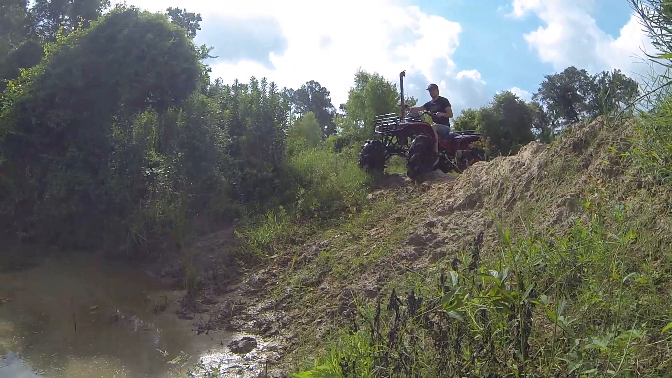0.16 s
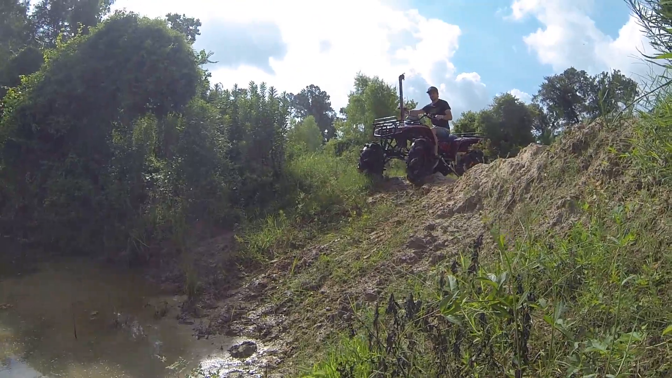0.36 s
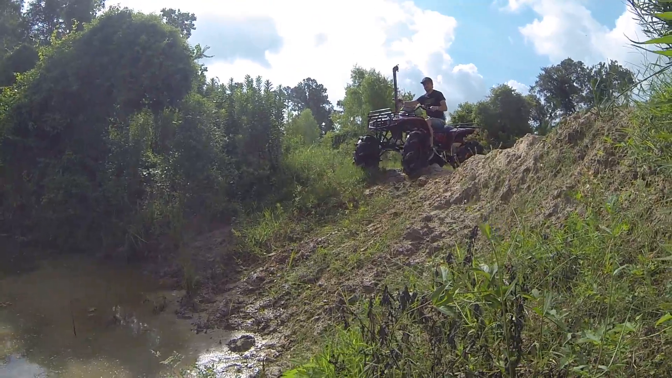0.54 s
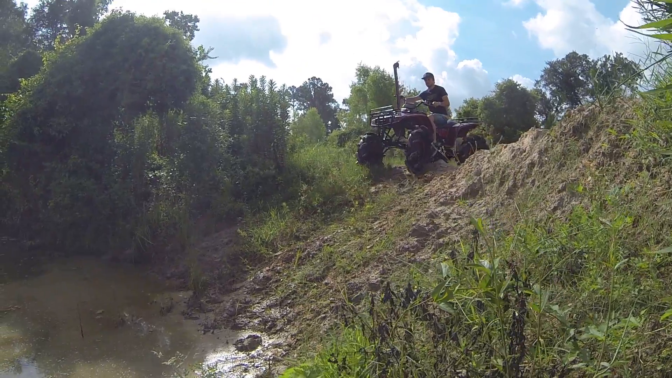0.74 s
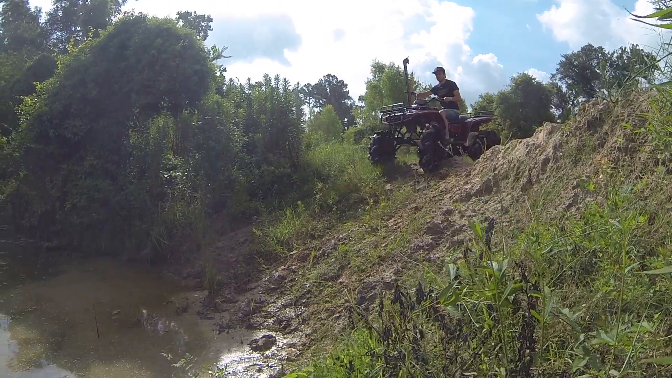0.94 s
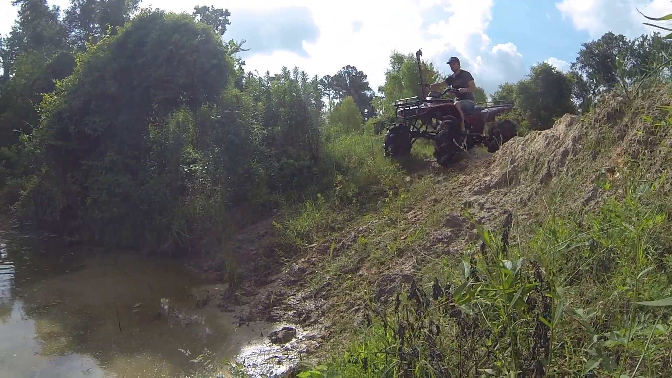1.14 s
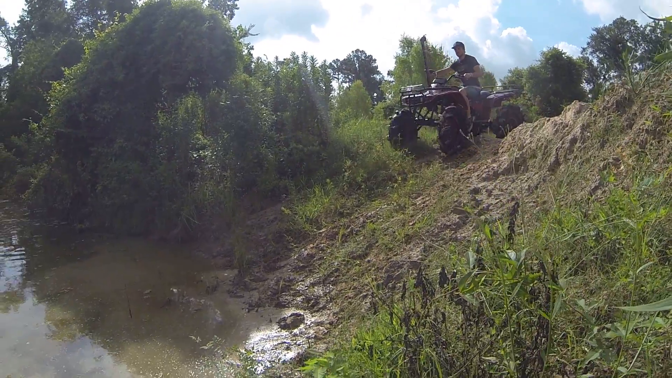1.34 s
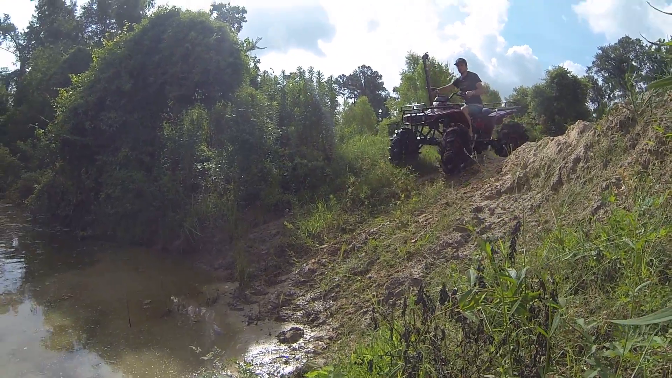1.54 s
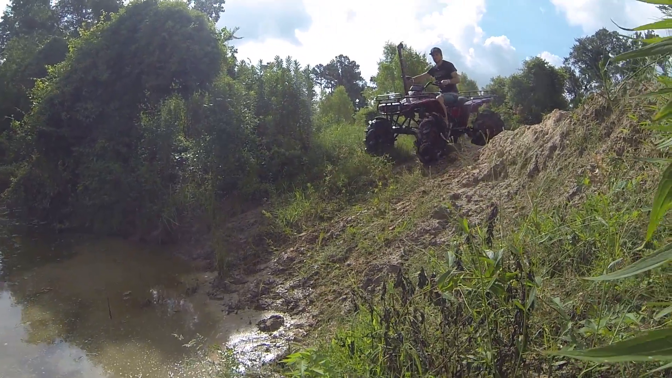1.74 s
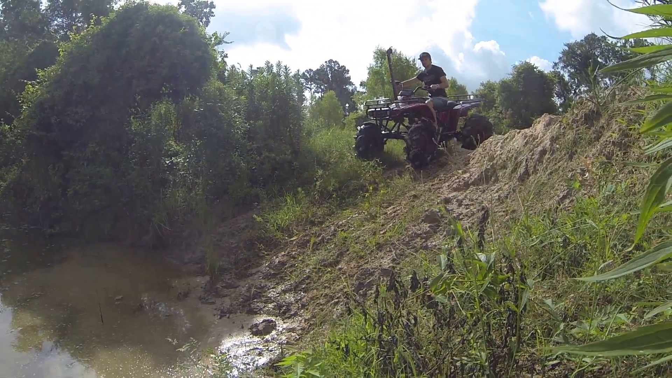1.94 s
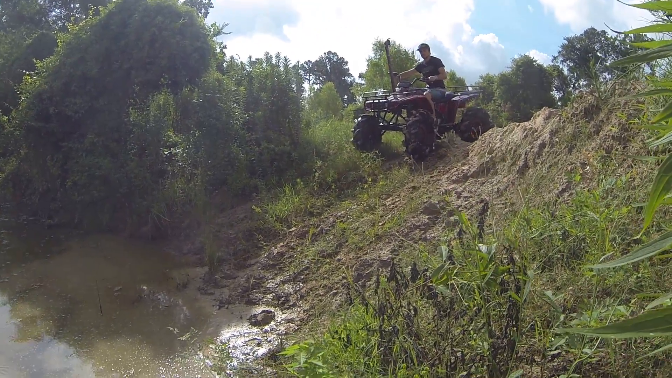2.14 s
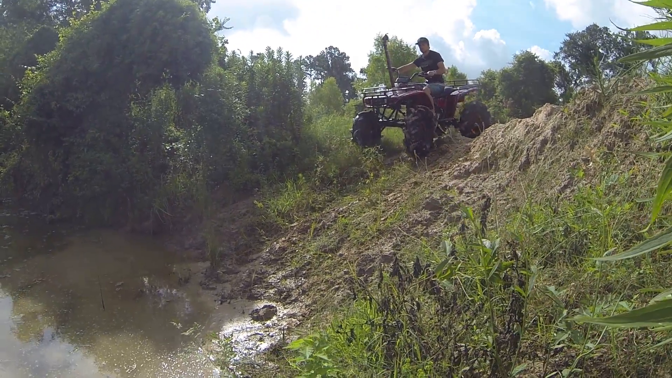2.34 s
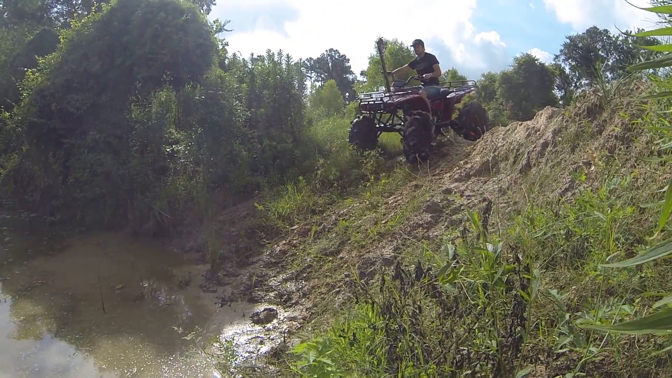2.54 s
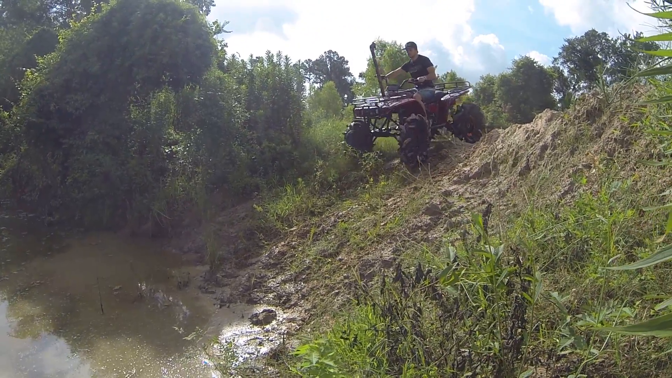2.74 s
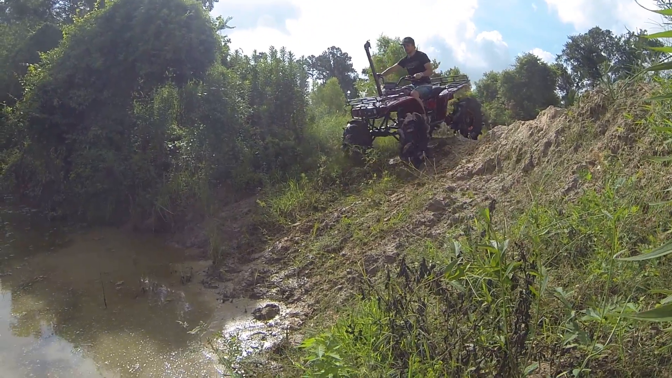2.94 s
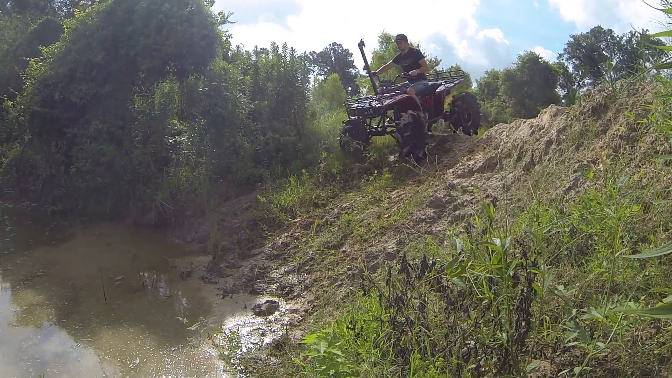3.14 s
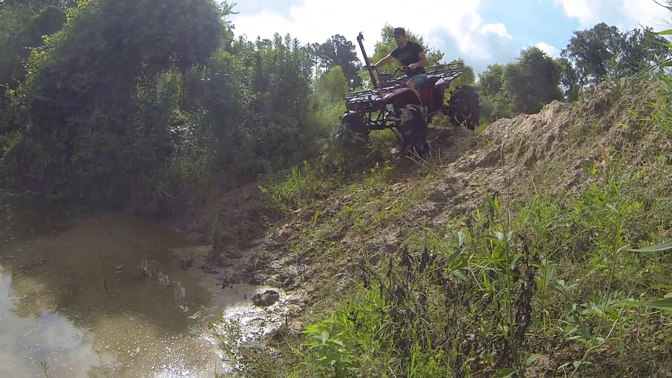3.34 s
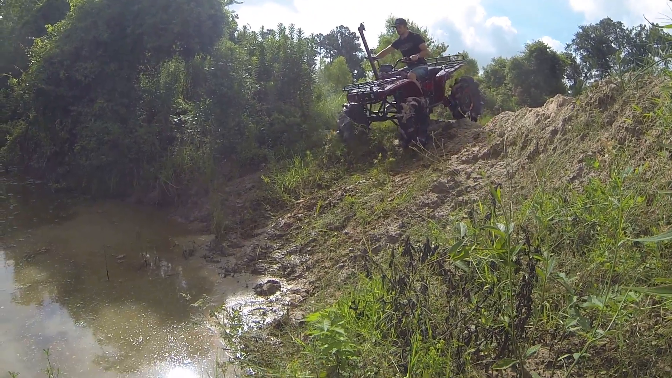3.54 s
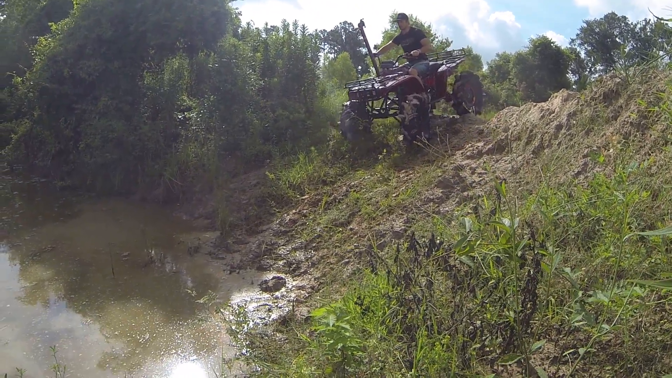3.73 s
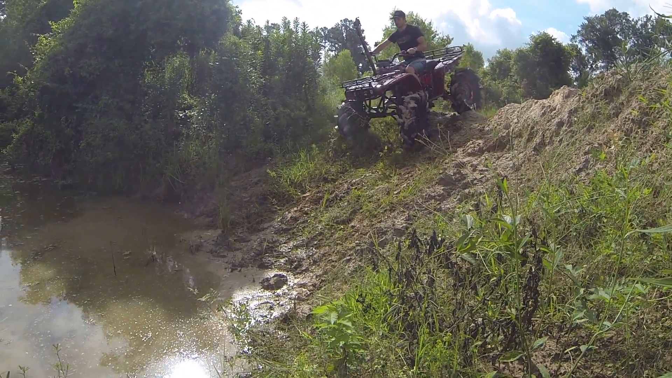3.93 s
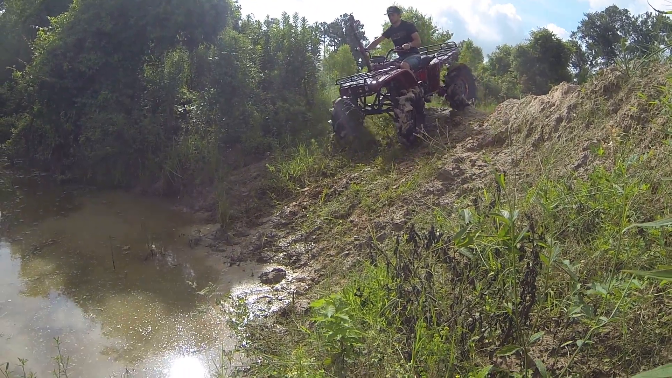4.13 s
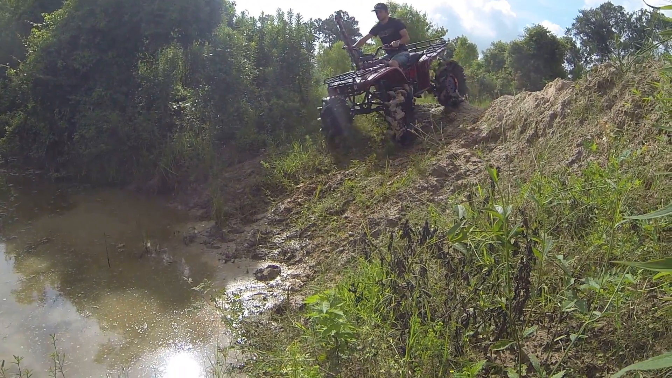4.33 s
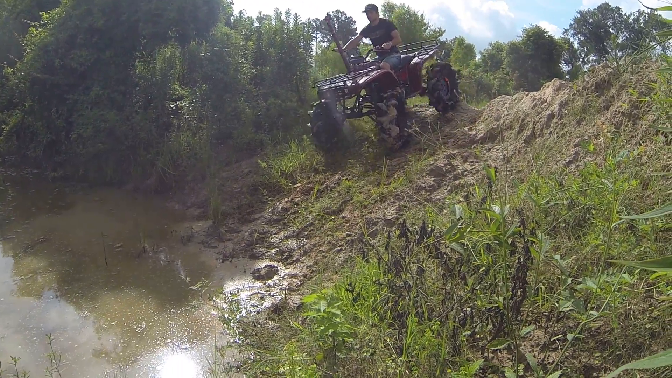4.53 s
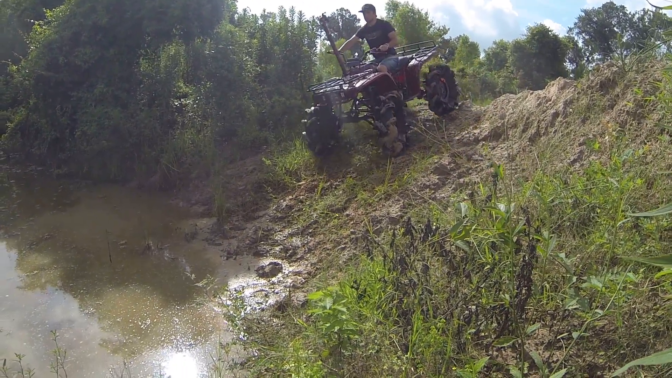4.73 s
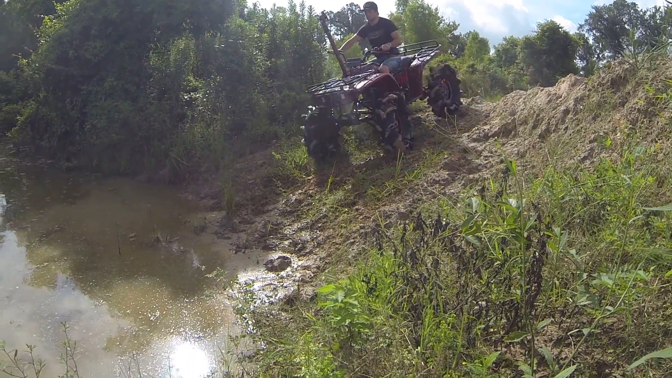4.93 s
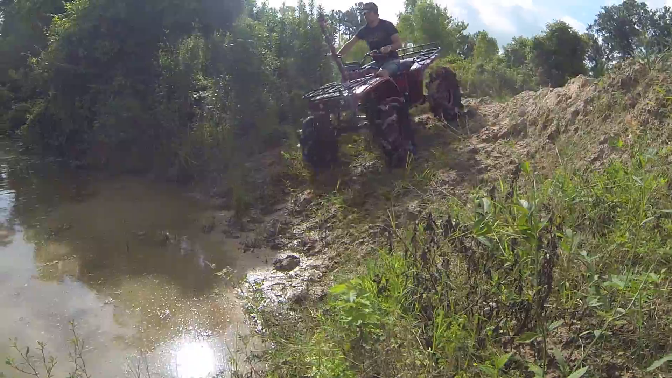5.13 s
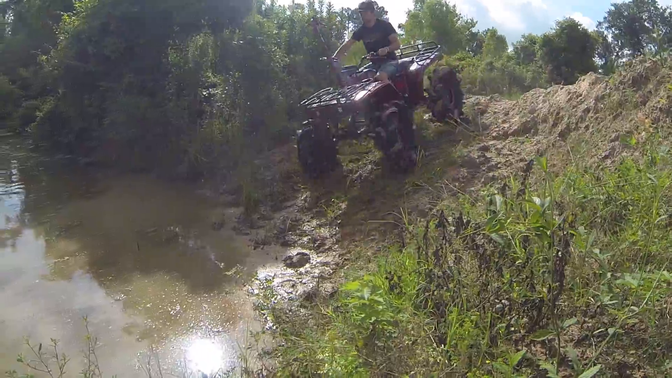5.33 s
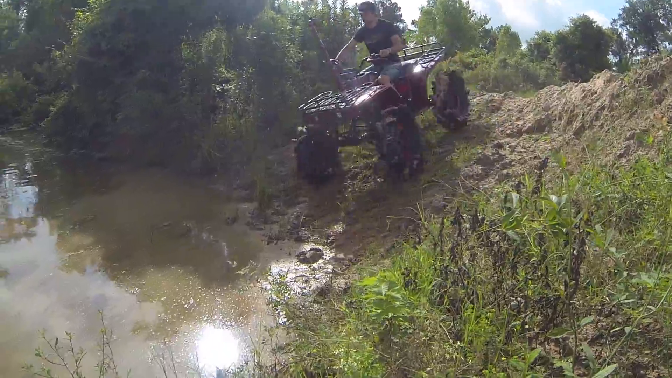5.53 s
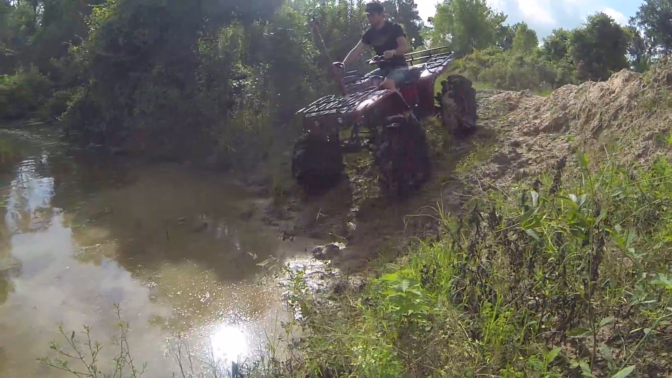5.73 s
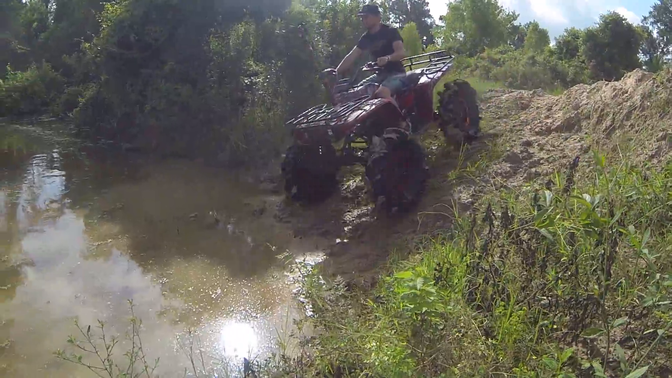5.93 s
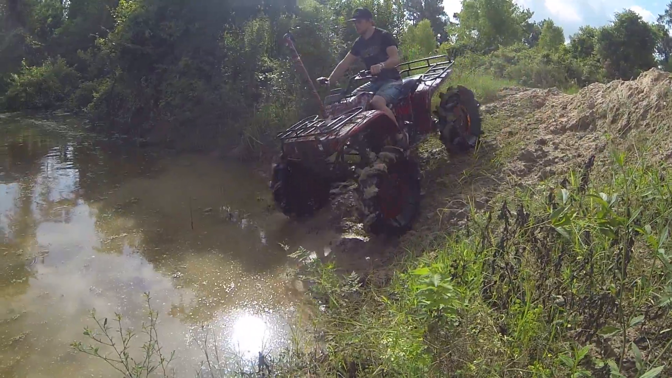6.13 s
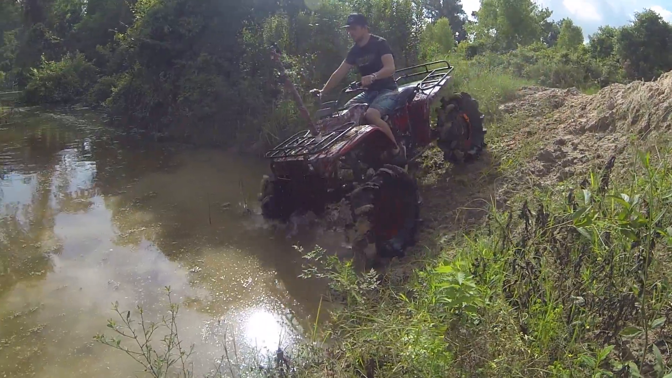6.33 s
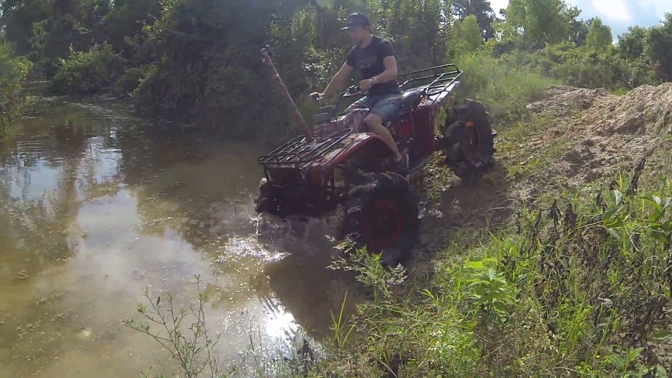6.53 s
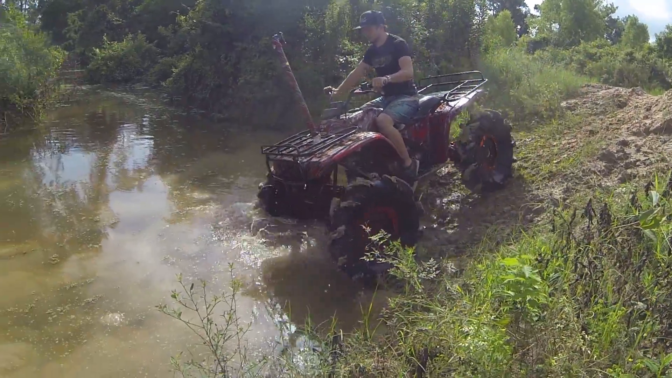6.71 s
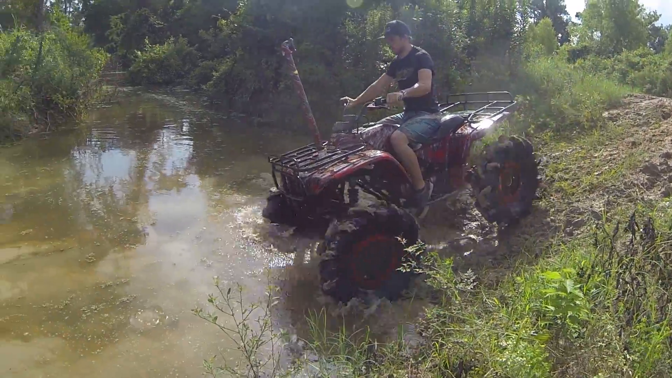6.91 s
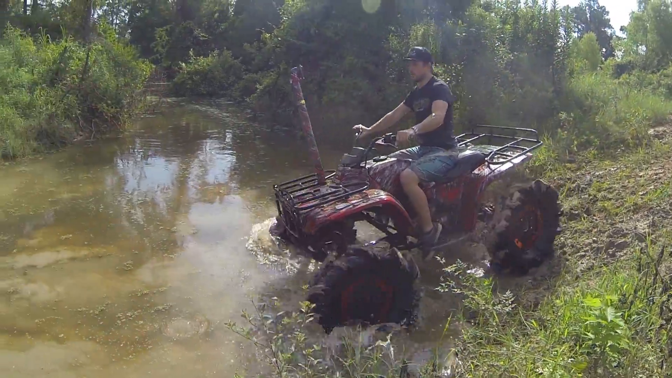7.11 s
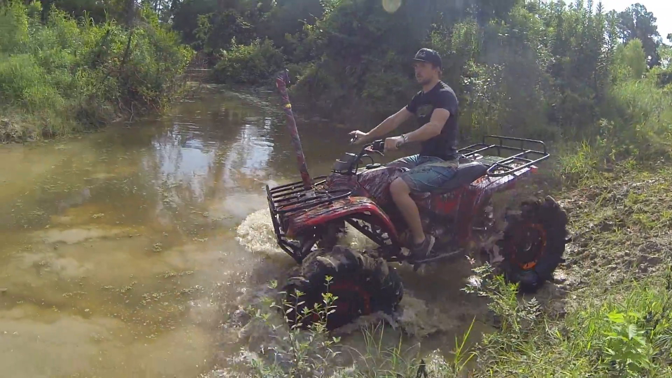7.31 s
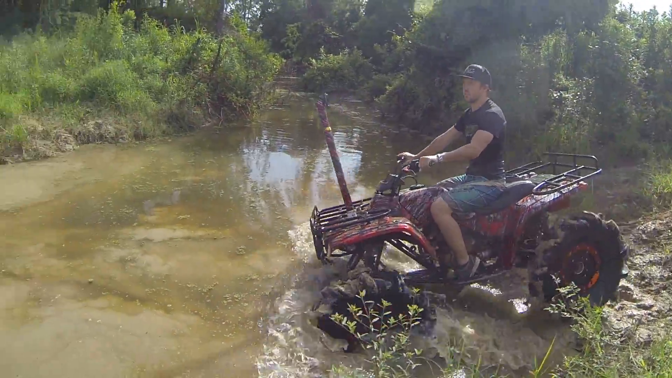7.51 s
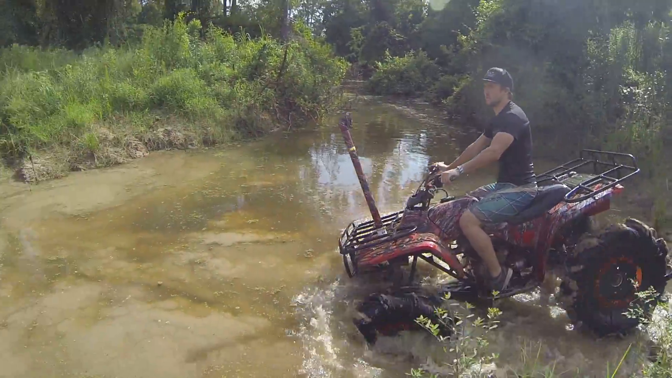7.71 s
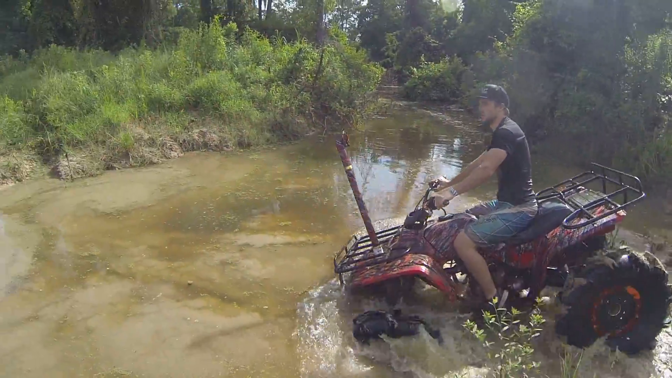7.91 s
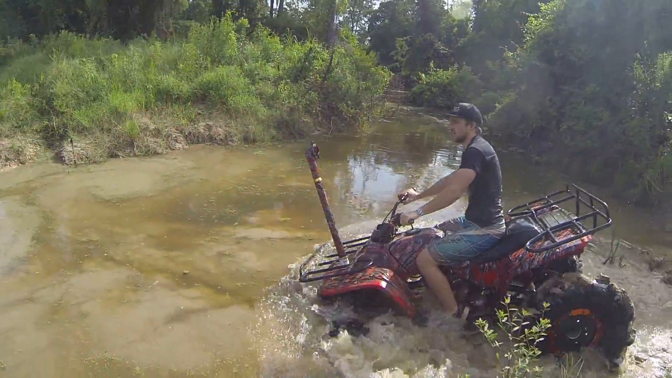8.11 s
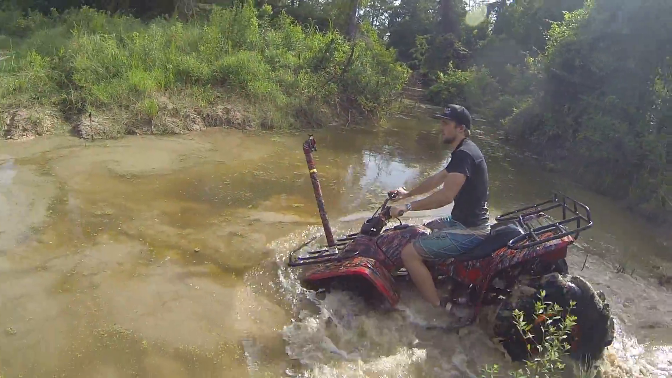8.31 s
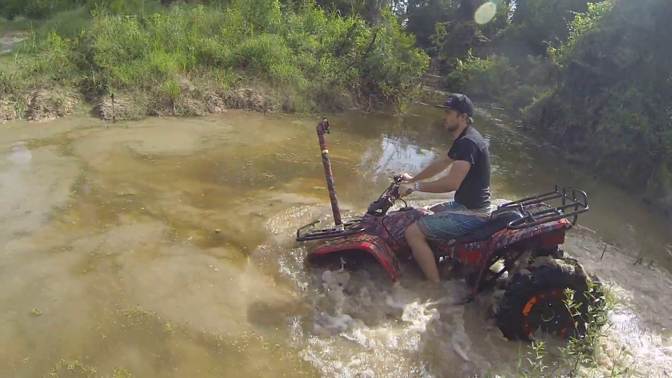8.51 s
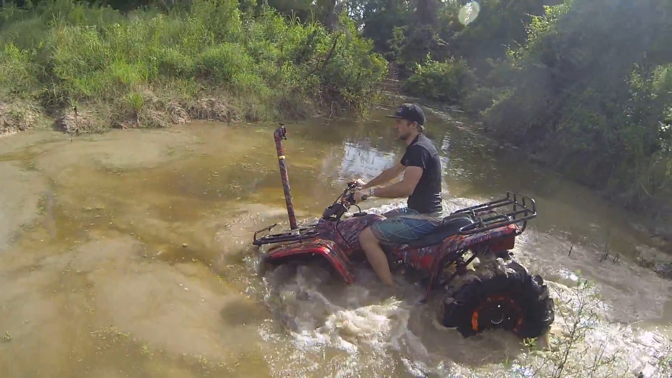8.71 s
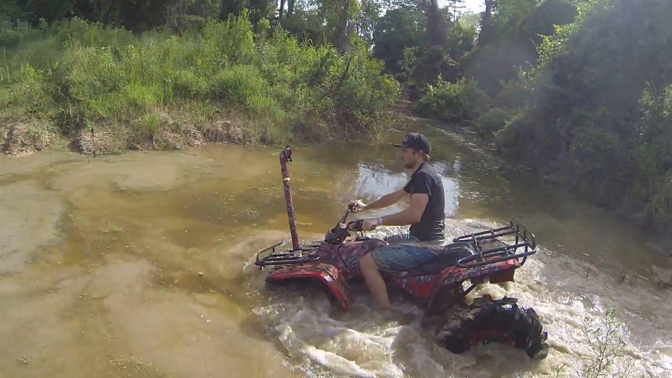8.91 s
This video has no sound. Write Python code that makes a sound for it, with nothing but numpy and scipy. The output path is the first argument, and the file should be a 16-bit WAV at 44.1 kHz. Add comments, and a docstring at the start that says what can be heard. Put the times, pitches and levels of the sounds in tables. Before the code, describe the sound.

A single-cylinder quad starts at moderate distance with two throttle blips, its low exhaust thumps separate and rattly. It slows to a lumpy crawl with missed firings while approaching, then pulls harder into a pond. Tyres churn, spray and gurgle, the frame knocks, and the outlet and casing become dull under water. Quiet open air and a very faint thin whine lie beneath, heard through a boxy, enclosed single microphone.

```python
"""At a flooded mud hole, a single-cylinder quad creeps down a bank, comes close and wades in.
Its exhaust thumps once per engine cycle, harder at speed, with runs of weak firings: short
puffs ring the silencer, and filtered noise adds flutter and rasp. Noise and ticks make the casing clatter.
The frame knocks and a dry hiss swells early on. Noise, drops and bubble notes make the tyres churn and splash.
Casing and outlet grow dull in the water. Soft outdoor air and a thin whine lie beneath."""
import sys
import numpy as np
from scipy import signal
from scipy.fft import rfft, irfft, next_fast_len
from scipy.io import wavfile

SR = 44100
rng = np.random.default_rng(int(sys.argv[2]) if len(sys.argv) > 2 else 0)


def bounce(signal):
    """Save signal as a 16-bit WAV file at the path given by the first command-line argument."""
    frames = np.transpose(np.atleast_2d(signal))
    limited = np.clip(frames, -1, 1)
    pcm = np.round(limited * 32767).astype(np.int16)
    wavfile.write(sys.argv[1], SR, pcm)


N = 399546
TIME = np.arange(N) / SR  # seconds

# Engine speed: two blips of throttle, a crawl down the bank, a pull through the water.
# Each row: time in seconds, speed in engine cycles per second.
ENGINE_SPEED = [(0, 15.008), (0.31, 20.131), (0.93, 21.088), (1.18, 15.658), (1.52, 13.641), (1.86, 14.923),
                (2.23, 20.195), (2.42, 20.35), (2.51, 17.026), (2.85, 13.065), (3.31, 10.77),
                (3.34, 13.574), (3.62, 10.292), (3.86, 12.922), (4.02, 11.753), (4.49, 13.293),
                (4.64, 11.038), (4.84, 13.614), (5.32, 12.412), (5.43, 14.543), (6.37, 15.951),
                (6.96, 17.705), (7.63, 17.113), (7.79, 15.63), (8.44, 15.378), (9.06, 18.14)]
CRUISE = 16  # reference speed, engine cycles per second

# How open the engine is to the ear as it turns side-on and then goes under.
# Each row: time in seconds, change in casing clatter in dB, change in outlet rasp in dB.
ENGINE_EXPOSURE = [(0, 1.5, -1.5), (2.6, 1.5, -4), (4.2, 0.5, -2), (5.6, -1, -5.5), (7, 3, -2),
                   (7.35, 3, -1), (7.65, 3.5, -2.5), (7.9, -5.5, -28), (8.65, -8.5, -5.5), (9.06, -27, -9)]


def amp(db):
    """Turns decibels into a gain."""
    return 10 ** (np.asarray(db) / 20)


def unit(x):
    """Scales a sound to an average strength (rms) of 1."""
    return x / np.sqrt(np.mean(x ** 2) + 1e-20)


def curve(rows, t=TIME, column=1):
    """Reads one column of a time table, with straight lines between the rows."""
    rows = np.array(rows, float)
    return np.interp(t, rows[:, 0], rows[:, column])


def shape(points, hz):
    """Reads gains from a spectrum table of (Hz, dB), with pitch on a log scale."""
    f, db = np.transpose(points)
    return amp(np.interp(np.log(hz + 1), np.log(f + 1), db))


def modes(rows, hz):
    """Sums the response of resonances, each given as (Hz, width in Hz, dB)."""
    total = 0
    for f, width, db in rows:
        total = total + amp(db) / (1 + 1j * (hz ** 2 - f ** 2) / (hz * width + 1e-9))
    return total


def causal_taps(points, rings=(), size=8192):
    """Makes a filter with the given spectrum that rings only after it is struck."""
    hz = abs(np.fft.fftfreq(size, 1 / SR))
    log_gain = np.log(np.hypot(shape(points, hz), abs(modes(rings, hz))))
    response = np.exp(np.conj(signal.hilbert(log_gain)))  # minimum phase
    return np.fft.ifft(response).real[:size // 2]


def colour(x, points):
    """Filters a sound to a spectrum of (Hz, dB) and scales it to rms 1."""
    return unit(signal.oaconvolve(x, causal_taps(points))[:N])


def noise():
    """Plain white noise, the raw material of the rushing sounds."""
    return rng.standard_normal(N)


def wander(rate_hz):
    """Random drift of rms 1, with little movement faster than the given rate."""
    size = next_fast_len(N, True)
    hz = np.fft.rfftfreq(size, 1 / SR)
    spectrum = rfft(rng.standard_normal(size)) * np.exp(-(hz / rate_hz) ** 2)
    return unit(irfft(spectrum, size)[:N])


def clicks(per_s, spread_db):
    """Random clicks of either sign and uneven size, scaled to rms 1."""
    size = amp(spread_db * np.minimum(rng.exponential(1, N), 5)) * rng.choice([-1, 1], N)
    return unit(size * (rng.random(N) < per_s / SR))


def add(mix, s, sound):
    """Mixes a sound in at time s, cutting off what falls outside."""
    start = round(s * SR)
    part = mix[max(start, 0):max(start + len(sound), 0)]
    part += sound[max(-start, 0):][:len(part)]


def bursts(times, gains, rise_s, fall_s):
    """An envelope that swells and dies after each given moment."""
    t = np.arange(0, 10 * fall_s, 1 / SR)
    swell = (1 - np.exp(-t / rise_s)) * np.exp(-t / fall_s)
    swell /= swell.max()
    out = np.zeros(N)
    for s, gain in zip(times, gains):
        add(out, s, gain * swell)
    return out


def engine_db(t):
    """The engine is louder the nearer it is and the faster it runs."""
    # The quad comes closer. Each row: time in seconds, level of a full firing at cruising speed in dB.
    nearness = [(0, -28.5), (1.6, -28), (2.5, -26.5), (3.4, -26), (5.2, -24.5), (6.1, -22.5), (6.8, -20),
                (8.2, -19), (9.06, -18)]
    load_db = 0.6155  # dB per cycle per second above CRUISE
    return curve(nearness, t) + load_db * (curve(ENGINE_SPEED, t) - CRUISE)


def revving():
    """0 at a crawl, rising to 1 at the top of a blip of throttle."""
    return np.clip((curve(ENGINE_SPEED) - 13) / 7, 0, 1)


def firings():
    """Times the exhaust valve opens, and burn strength in dB; fuel left by a miss feeds the next firing."""
    # Runs of misfires. Each row: first second, last second, every how many cycles,
    # typical strength against a full firing in dB.
    misfires = [(1.04, 1.04, 1, -13), (2.5, 2.5, 1, -16), (2.9, 2.9, 1, -4), (3.06, 3.06, 1, -10),
                (3.24, 3.24, 1, -32), (3.67, 4.96, 2, -19), (5.34, 6.4, 2, -15), (6.46, 6.46, 1, -8),
                (6.59, 6.7, 2, -17), (7.05, 7.51, 4, -6)]
    miss_spread, full_miss_db, rich_db = 0.1, -15, 1  # rich_db: boost after a full miss
    cycles = np.cumsum(curve(ENGINE_SPEED)) / SR
    times = np.interp(np.arange(.5, cycles[-1]), cycles, TIME)
    burn_db = np.zeros(len(times))
    for first_s, last_s, every, db in misfires:
        first = np.argmin(abs(times - first_s))
        last = np.argmin(abs(times - last_s))
        burn_db[first:last + 1:round(every)] = db
    unburnt = np.clip(np.roll(burn_db, 1) / full_miss_db, 0, 1)
    varied_db = burn_db * (1 + miss_spread * rng.standard_normal(len(times)))
    return times, varied_db + rich_db * unburnt


def exhaust(times, burn_db):
    """Gas blows out sharply, then the rising piston pushes it and it rebounds; all ring the silencer."""
    # A puff of gas at cruising speed. Each row: frequency in Hz, level in dB.
    puff_spectrum = [(15, -46), (35, 12), (60, 0.5), (100, 1), (170, 2), (260, -5.5), (350, -11),
                     (420, -17.5), (550, -27), (800, -60)]
    # Silencer resonances at cruising speed. Each row: frequency in Hz, width in Hz,
    # level against the direct puff in dB.
    silencer_rings = [(101.6, 41, -1.5), (157, 17, -4), (249.7, 22.7, 2.5), (347.7, 15.5, 5)]
    # The way from the tailpipe past mud and water. Each row: time in seconds,
    # highest frequency that gets past in Hz, strength of the ground echo as a gain.
    tailpipe_path = [(0, 530, 0.32), (3.2, 520, 0.32), (4.8, 510, .08), (5.35, 377, 0.07), (5.9, 342, 0.64),
                     (6.5, 372, 0.75), (7, 400, 0.2), (7.65, 446, 0.24), (7.95, 276, 0.13),
                     (9.06, 268, 0.14)]
    echo_s, steep = 0.003, 20  # ground echo delay in seconds; steepness of the treble cut
    lag_s, lag_cycles = 0.00583, 0.0731  # wait before the piston's push: fixed part, part of a cycle
    push, rebound, push_hz = 0.99, 0.096, 310  # two gains; the push is softer above about this Hz
    shorten, bite = 0.26, 0.14  # a faster engine or a richer charge gives a shorter puff
    heat, damping = 0.15, 0.21  # fast hot gas raises and damps the resonances
    bass_per_cycle, uneven = 4.25, 0.066  # bass cut in Hz per unit of speed; random variation
    size = 16384
    lead = size // 4  # room ahead of the thump, in samples
    hz = np.fft.rfftfreq(size, 1 / SR)
    out = np.zeros(N)
    chances = 1 + uneven * rng.standard_normal((len(times), 3))
    for s, db, chance in zip(times, burn_db, chances):
        speed = curve(ENGINE_SPEED, s)
        pace = speed / CRUISE
        top_hz = curve(tailpipe_path, s, column=1)
        echo = curve(tailpipe_path, s, column=2)

        quick = chance[2] * pace ** shorten * amp(bite * max(db, 0))
        puff = shape(puff_spectrum, hz / quick)
        # close puffs merge into a steady flow and lose their bass
        puff = puff / np.hypot(1, (bass_per_cycle * speed / (hz + 1)) ** 3)
        silencer = 1 + pace ** -damping * modes(silencer_rings, hz / pace ** heat)

        delay = lag_s + lag_cycles / speed
        later = np.exp(-2j * np.pi * hz * delay - (hz / push_hz / chance[1]) ** 2)
        strokes = 1 + push * chance[0] * later + rebound * later ** 2
        path = 1 + echo * np.exp(-2j * np.pi * hz * echo_s)
        path = path / np.sqrt(1 + (hz / top_hz) ** steep)

        thump = np.roll(irfft(puff * silencer * strokes * path), lead)
        add(out, s - lead / SR, amp(engine_db(s) + db) * thump / thump.max())
    return out


def gas_flow(times, burn_db):
    """Every cycle makes gas flutter in the pipe; a good firing also rasps at the outlet."""
    flutter_db, rasp_db, chuff_db, jet_db = -25, -24, -3, -14  # chuff and jet are set against the rasp
    crack, ragged_db, grit = 1.9, 2.64, 0.89  # crack above 1: rasp grows faster than the thump
    force = amp(engine_db(times))
    blast = force * amp(crack * burn_db + ragged_db * rng.standard_normal(len(times)))

    flutter = colour(noise(), [(20, -22.5), (55, 1.5), (90, -16), (130, 1.5), (175, -4),
                               (270, -13.5), (400, -27), (800, -65.5)])
    flutter *= bursts(times - .008, force, rise_s=0.022, fall_s=0.026)

    gritty = noise() + grit * clicks(per_s=700, spread_db=2.5)
    rasp = colour(gritty, [(400, 0.5), (680, -2.5), (900, -20.5), (1450, 7.5), (1950, -12.5),
                           (2350, -14), (3300, -10.5), (4500, -18), (8000, -29), (15000, -42)])
    # a slow chuff rings lower than a fast gas jet
    chuff = colour(noise(), [(300, -60), (1000, -29), (2000, -15.5), (2320, 2), (2700, -26),
                             (5000, -23), (15000, -86)])
    jet = colour(noise(), [(300, -63), (1000, -40), (2900, -18), (3400, 4), (3900, -9.5),
                           (8000, -25), (15000, -68)])
    rasp += amp(chuff_db) * (1 - revving()) * chuff
    rasp *= bursts(times + 0.00026, blast, rise_s=0.00051, fall_s=0.0094)
    jet *= amp(jet_db) * revving() * bursts(times, blast, rise_s=0.0034, fall_s=0.026)
    outlet_gain = amp(rasp_db + curve(ENGINE_EXPOSURE, column=2))
    return amp(flutter_db) * flutter + outlet_gain * (rasp + jet)


def clatter(times, burn_db):
    """Gear rush and loose ticks ring the casing, hardest at combustion and as the exhaust valve opens."""
    # Colour of the engine casing. Each row: frequency in Hz, relative level in dB.
    casing_spectrum = [(400, -17), (900, -26.5), (1180, -7.5), (1370, 4), (1680, 4.5), (1930, -14),
                       (2250, -4), (2700, -11), (3300, -14), (4400, -25), (6700, -19.5), (8500, -27),
                       (11000, -30), (15000, -27)]
    level_db, waver_db, tick_share = -31.5, 1.4, 0.81
    knock, knock_cycles, shake = 0.54, 0.269, 0.48  # combustion comes this part of a cycle early
    throb, throb_s = 0.21, 0.0013  # rattle throb at high revs, and its delay in seconds
    drive = noise() + tick_share * clicks(per_s=290, spread_db=-3)
    combustion_times = times - knock_cycles / curve(ENGINE_SPEED, times)
    combustion = bursts(combustion_times, amp(burn_db), rise_s=.001, fall_s=0.016)
    valve = bursts(times + 0.0018, amp(burn_db), rise_s=0.0051, fall_s=0.019)
    turns = np.interp(TIME - throb_s, times, np.arange(len(times)))  # firings so far
    drive *= 1 + knock * combustion + shake * valve
    drive *= 1 + throb * revving() * np.cos(2 * np.pi * turns)
    loudness_db = engine_db(TIME) + curve(ENGINE_EXPOSURE) + level_db + waver_db * wander(rate_hz=38)
    return amp(loudness_db) * colour(drive, casing_spectrum)


def air():
    """Filtered noise makes soft outdoor rumble and hiss; a throbbing high tone makes a thin whine."""
    # The still air round the pond. Each row: frequency in Hz, relative level in dB.
    air_spectrum = [(15, 14), (40, 7.5), (90, 12), (200, 1), (450, -6), (900, -12), (2000, -13.5),
                    (4400, -16), (8500, -18.5), (11500, -32), (14000, -25.5), (16000, -34)]
    air_db, whine_db = -54, -82
    whine_hz, buzz_hz, buzz = 13906, 60, 0.77
    hush = amp(air_db) * colour(noise(), air_spectrum)
    throb = 1 + buzz * np.cos(2 * np.pi * buzz_hz * TIME)
    whine = unit(throb * np.sin(2 * np.pi * whine_hz * TIME))
    return hush + amp(whine_db) * whine


def brakes():
    """A dry hiss, as of dragging brake pads, swells and fades while the quad tips over the crest."""
    level_db, peak_s, spread_s = -69, 1.55, 0.79
    hiss = colour(noise(), [(1500, -34), (2700, -14), (3300, 5), (4300, -12), (5700, -7),
                            (6700, 1), (7600, -21), (15000, -30)])
    return amp(level_db) * np.exp(-((TIME - peak_s) / spread_s) ** 2) * hiss


def splats(per_s=35, spread_db=3, fall_s=0.0027):
    """An envelope of clumps of water that land at random and die away quickly."""
    landings = abs(clicks(per_s, spread_db))
    return unit(signal.lfilter([1], [1, -np.exp(-1 / (fall_s * SR))], landings))


def bubbles(count=24, per_s=45, ring_cycles=5, glide=0.09):
    """Bubbles of many sizes, each a short note that rises as it nears the surface."""
    out = np.zeros(N)
    for hz in np.geomspace(450, 4200, count):
        age = np.arange(round(5 * ring_cycles / hz * SR)) / SR * hz / ring_cycles  # in decay times
        note = np.exp(-age) * np.sin(2 * np.pi * ring_cycles * age * (1 + glide * age / 2))
        out += signal.oaconvolve(clicks(per_s, spread_db=4), note)[:N]
    return unit(out)


def water():
    """Tyres heave and churn the pond, fold air into it and fling spray that falls back as drops."""
    # Water thrown by the wheels. Each row: time in seconds, base level of churning in dB,
    # base level of spray in dB.
    wheel_water = [(6.1, -64.5, -60), (6.28, -66, -54), (6.6, -64.5, -57), (7.2, -58.5, -49.5),
                   (7.55, -55, -47), (8, -54, -47.5), (8.7, -60, -53), (9.06, -57.5, -54)]
    # Colour of the churning. Each row: frequency in Hz, relative level in dB.
    churn_spectrum = [(20, -13), (120, 10.5), (300, 7.5), (500, 3.5), (700, 0), (1100, 2.5), (2000, 0.5),
                      (4000, -31), (15000, -31)]
    # Colour of the spray. Each row: frequency in Hz, relative level in dB.
    spray_spectrum = [(500, -39), (1400, 9), (2300, 3.5), (3600, 0), (4600, -7), (7000, -7.5), (8600, -12),
                      (10500, -15.5), (14500, -28)]
    wet_s, wetting_s = 5.92, 0.35  # the tyres reach the water, and are wet this much later
    churn_db, spray_db, bubble_db = 1, -3, -6  # added to the base levels
    heave_db, gush_db, gurgle_db = 4.5, 1.5, 3  # random swing of churn, spray and bubbles
    drop_share, splat_share = 0.59, 0.2
    wet = np.clip((TIME - wet_s) / wetting_s, 0, 1)
    churn = colour(noise(), churn_spectrum) * amp(churn_db + heave_db * wander(rate_hz=45))
    drops = noise() + drop_share * clicks(per_s=2200, spread_db=1)
    spray = colour(drops * (1 + splat_share * splats()), spray_spectrum)
    spray *= amp(spray_db + gush_db * wander(rate_hz=110))
    gurgle = amp(bubble_db + gurgle_db * wander(rate_hz=23)) * bubbles()
    churn_gain = amp(curve(wheel_water, column=1))
    spray_gain = amp(curve(wheel_water, column=2))
    return wet * (churn_gain * (churn + gurgle) + spray_gain * spray)


def knocks():
    """The frame and suspension rattle as the wheels drop into the hole: short bursts of ringing noise."""
    # Each row: time in seconds, strength in dB before level_db is added.
    frame_knocks = [(6.257, -32), (7.33, -31.5), (7.487, -27), (7.583, -47), (8.609, -40), (8.678, -36)]
    level_db = -4
    s, db = np.transpose(frame_knocks)
    ring = colour(noise(), [(600, -37), (1250, -3), (1550, 16), (1900, -7), (4000, -27), (15000, -65)])
    return ring * bursts(s, amp(db + level_db), rise_s=0.0011, fall_s=0.0045)


def plunges():
    """A wheel that drops into deep water slaps the surface and shoves a low surge ahead of it."""
    # Each row: start in seconds, level of the deep surge in dB, its decay in seconds, level of the slap in dB.
    wheel_plunges = [(7.49, -41, .07, -51.5), (7.65, -58, .05, -55.5), (8.55, -45, .3, -83)]
    surge = colour(noise(), [(10, -12), (25, 11), (45, -7), (90, -26), (300, -45), (1000, -53)])
    slap = colour(noise(), [(800, -8), (2500, -11), (4000, 13), (4600, -5), (15000, -35)])
    out = np.zeros(N)
    for s, surge_db, decay_s, slap_db in wheel_plunges:
        out += surge * bursts([s], [amp(surge_db)], rise_s=0.047, fall_s=decay_s)
        out += slap * bursts([s], [amp(slap_db)], rise_s=.02, fall_s=0.045)
    return out


def scene():
    """Adds engine, air, brakes, water and knocks together in one channel."""
    times, burn_db = firings()
    engine = exhaust(times, burn_db) + gas_flow(times, burn_db) + clatter(times, burn_db)
    surroundings = air() + brakes()
    splashing = water() + knocks() + plunges()
    return (engine + surroundings + splashing)[None]


def record(dry):
    """A closed case colours every sound, the level rises at the start, and the highest treble is cut."""
    # Sound through the wall of the case. Each row: frequency in Hz, level in dB.
    wall_spectrum = [(20, 1), (1000, -0.5), (1950, -6.5), (4400, -3.5), (9000, -7), (15000, -2.5)]
    # Resonances of the case. Each row: frequency in Hz, width in Hz, level in dB.
    case_resonances = [(1374, 85, -2), (1578, 460, 1), (2143, 88, -2), (3230, 400, 0), (5136, 360, 2.5),
                       (6600, 174, 1), (8150, 250, 2), (9770, 470, -5.5)]
    fade_in_s, fade_in_db = 0.46, -8  # length of the rise, and the level it starts from
    edge_hz = 15260  # treble above this is cut
    boxed = signal.oaconvolve(dry, causal_taps(wall_spectrum, case_resonances)[None])[:, :N]
    faded = boxed * amp(fade_in_db * np.clip(1 - TIME / fade_in_s, 0, 1))
    treble_cut = signal.firwin(511, edge_hz, window=("kaiser", 9), fs=SR)
    return signal.oaconvolve(faded, treble_cut[None], "same")


dry = scene()
out = record(dry)
bounce(out)
```